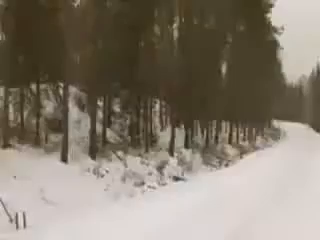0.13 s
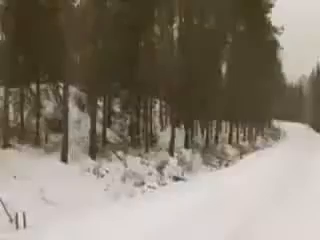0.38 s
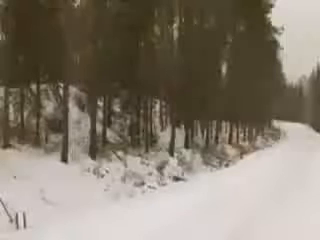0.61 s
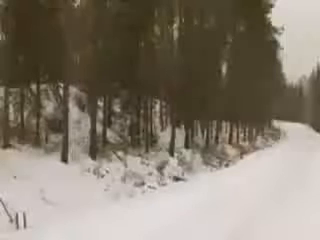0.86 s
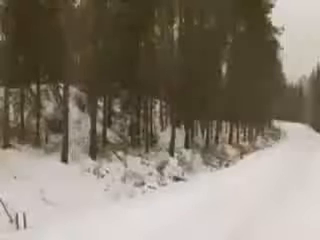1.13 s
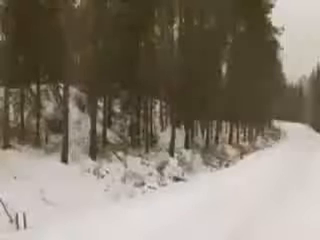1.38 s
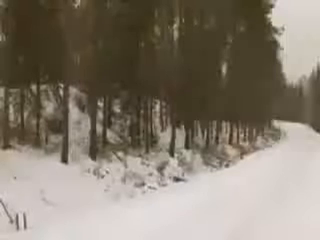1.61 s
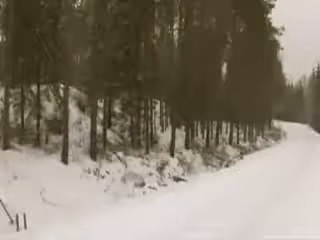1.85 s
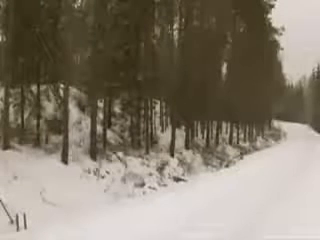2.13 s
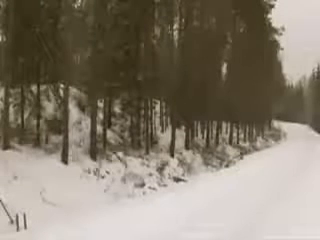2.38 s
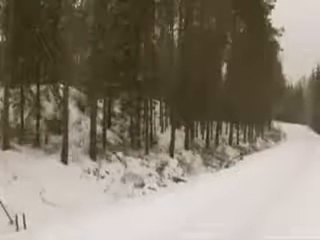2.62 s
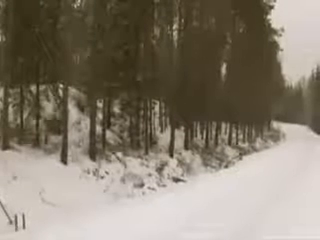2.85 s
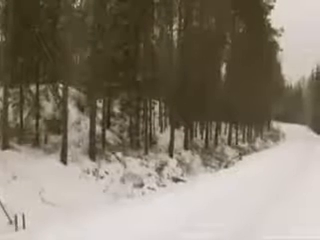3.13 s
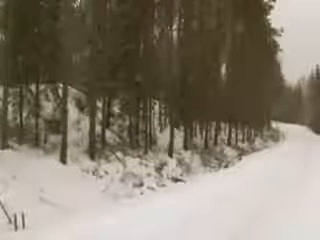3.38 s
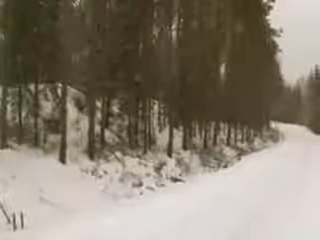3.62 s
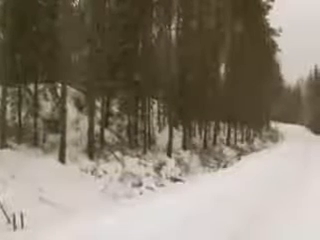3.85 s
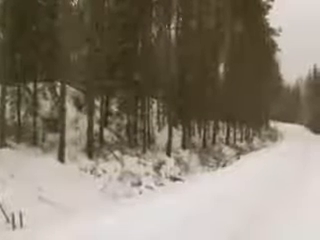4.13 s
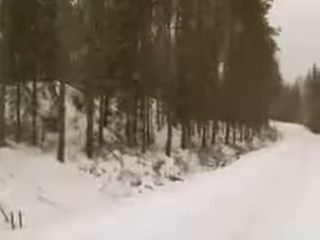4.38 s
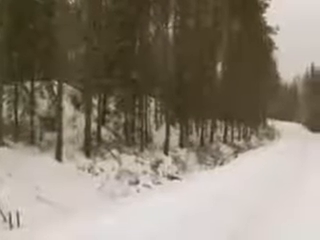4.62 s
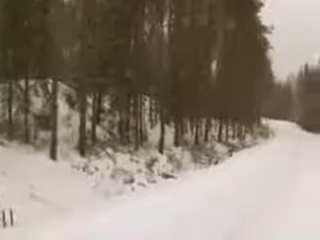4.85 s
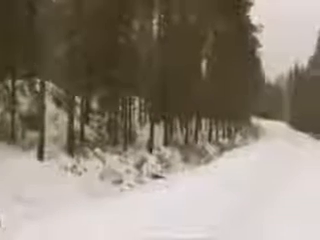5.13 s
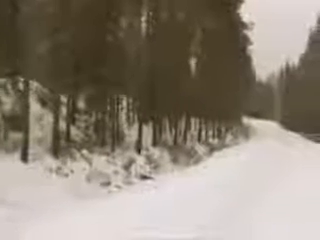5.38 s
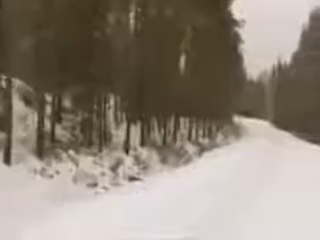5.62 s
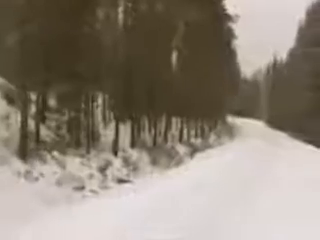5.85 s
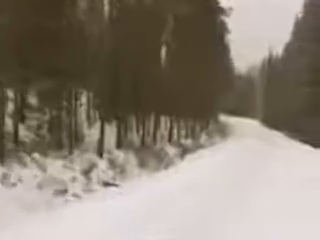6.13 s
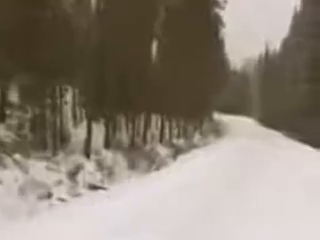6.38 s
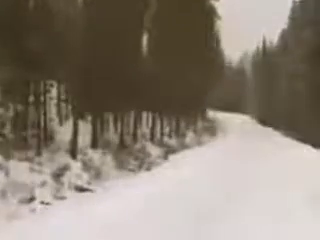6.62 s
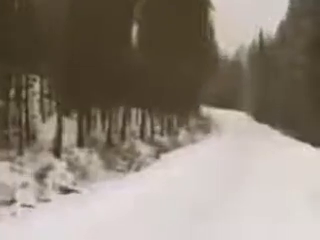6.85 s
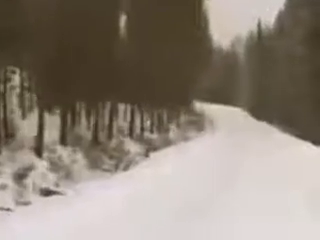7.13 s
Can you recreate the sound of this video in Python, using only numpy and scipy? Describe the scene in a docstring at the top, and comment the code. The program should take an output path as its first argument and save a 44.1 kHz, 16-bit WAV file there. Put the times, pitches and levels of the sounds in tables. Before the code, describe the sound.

Outdoors in a snowy spruce forest, an unseen hound yelps singly, first with smooth, hollow cries, then with brighter, rougher ones. Trunks answer at once and a diffuse tail follows. Rustling and dull hand knocks near the microphone soon settle into soft hiss. A longer pause comes near three seconds, then more yelps, and a last shorter, higher one. The sound is nearly mono and dull on top.

```python
"""A hound yelps again and again while it runs through a snowy spruce forest; the trunks hold each yelp on.
Close by, a rustle, a low rush and handling rumble die away over a quiet hiss.
Each yelp is a stack of gliding tones, roughened at random; hoarse puffs and the other layers are shaped noise.
The forest is a few early echoes and three long tails of scattered ones.
One signal feeds both channels, the left a little late above the bass."""
import sys
import numpy as np
from scipy import signal
from scipy.io import wavfile
from scipy.ndimage import uniform_filter1d

SR = 44100
rng = np.random.default_rng(int(sys.argv[2]) if len(sys.argv) > 2 else 0)


def to_wav(sig):
    """Store sig (one row per channel, or 1-D mono) as 16-bit WAV at the path in sys.argv[1].

    Samples outside -1..1 are clipped; the rate is SR.
    """
    pcm = np.clip(np.atleast_2d(sig), -1, 1) * 32767
    pcm = np.round(pcm).astype(np.int16)
    wavfile.write(sys.argv[1], SR, pcm.T)  # frames by channels


def volts(x):
    """Linear amplitude factor 10**(x/20) for a level x in dB, scalar or array-like."""
    e = np.asarray(x, float) / 20
    return 10 ** e


N = 319391  # length of the scene in samples


def evened(x):
    """Scales a sound to an rms (average strength) of 1."""
    return x / np.sqrt(np.mean(abs(x) ** 2) + 1e-20)


def read(points, hz):
    """Reads a table at the given frequencies, with straight lines along a log-frequency axis."""
    table_hz, value = np.transpose(points)
    return np.interp(np.log(hz + 1), np.log(table_hz + 1), value)


def curve(rows):
    """Turns a table of times and levels into a gain at every sample."""
    time_s, db = np.transpose(rows)
    return volts(np.interp(np.arange(N) / SR, time_s, db))


def swells(rows):
    """Adds up bell-shaped rises of gain."""
    t = np.arange(N) / SR
    return sum(volts(db) * np.exp(-((t - centre_s) / width_s) ** 2) for centre_s, db, width_s in rows)


def drift(shape, size):
    """Slow random swings of rms 1: random numbers averaged twice over size samples."""
    once = uniform_filter1d(rng.standard_normal(shape), size=size)
    return evened(uniform_filter1d(once, size=size))


def noise(spectrum, patchy_db, size=1024):
    """Noise of rms 1 from random short-time spectra whose level drifts in patches of time and pitch."""
    frames, hz = 4 * N // size + 5, np.fft.rfftfreq(size, 1 / SR)
    a, b, patches = rng.standard_normal((frames, len(hz), 3)).T
    patches = uniform_filter1d(patches, size=10, axis=0)
    patches = evened(uniform_filter1d(patches, size=8, axis=1))
    level_db = read(spectrum, hz)[:, None] + patchy_db * patches
    spectra = (a + 1j * b) * volts(level_db)
    return evened(signal.istft(spectra, nperseg=size, noverlap=size * 3 // 4)[1][:N])


def add(mix, start_s, sound):
    """Mixes a sound in at its start time."""
    part = mix[round(start_s * SR):][:len(sound)]
    part += sound[:len(part)]


def yelp(start_s, length_s, onset_hz, held_hz, settle_s, ground_tone_db, attack_s, swell_db, open_db,
         facing_db, per_glide):
    """A gliding stack of partials; the folds close unevenly as the pitch moves, roughening high ones most."""
    # colour of the fourth and higher partials after throat and air: (frequency [Hz], level [dB])
    throat = [(1800, 16.5), (2200, 0), (2550, 3.5), (2850, -27), (3200, -17), (3700, -22), (4500, -19),
              (6000, -18), (7500, -31), (8600, -38.5)]
    # the throat is tuned to the held note, so partials change off it:
    # second, third, higher partials [dB per octave]
    off_note_db = (-28, -47, -25)
    # change against the ground tone at the very end: second, third, higher partials [dB]
    closing_db = (13, -9.5, 11.5)
    attack_db, release_s, release_db = -15.5, 0.0331, -19.5
    settle_shape = 1.5963  # exponent of the slide from onset to held note
    sag_s, sag = 0.0533, 0.1203  # the pitch drops by this share as the breath runs out
    hoarse = .035  # roughness of a held note

    t = np.arange(0, length_s, 1 / SR)
    left_s = length_s - t
    hz = held_hz * (onset_hz / held_hz) ** np.exp(-(t / settle_s) ** settle_shape)
    hz = hz * (1 - sag * np.clip(1 - left_s / sag_s, 0, 1) ** 2)

    # levels of the ground tone, second, third and higher partials
    through = t / length_s - .5
    closing = np.clip(1 - left_s / release_s, 0, 1) ** 2
    attack = np.clip(1 - t / attack_s, 0, 1)
    ground_db = ground_tone_db + swell_db * through + attack_db * attack + release_db * closing
    octaves_off = abs(np.log2(hz / held_hz)) * (left_s > sag_s)  # the final sag does not count
    over_db = np.outer(off_note_db, octaves_off) + open_db * through
    over_db = over_db + np.outer(closing_db, closing) + np.c_[list(facing_db[:3])]
    waver_db = 3 * drift((4, len(t)), size=round(0.013 * SR))  # each level swings on its own
    *low_db, high_db = ground_db + np.vstack([0 * t, over_db]) + waver_db

    wobble = evened(uniform_filter1d(rng.standard_normal(len(t)), size=300))
    turns = np.cumsum(hz * (1 + 0.01177 * wobble)) / SR
    k = np.arange(1, 18)[:, None]  # number of each partial

    # the treble follows all overtones, with slow uneven swings
    effort_db = 20 * np.log10(np.linalg.norm(volts([*low_db[1:], high_db]), axis=0))
    treble_db = effort_db + facing_db[3] + 3.0 * drift((len(k), len(t)), size=500)
    level_db = read(throat, k * hz) + np.where(k * hz > 3000, treble_db, high_db)
    level_db[:3] = low_db

    # a growing share of each partial is replaced by random swings, which smears its pitch
    rough = hoarse + per_glide * abs(np.gradient(np.log2(hz), t))
    share = np.clip(rough * k ** 1.2, 0, .9)
    a, b = drift((2, len(k), len(t)), size=90) / np.sqrt(2)
    swing = np.sqrt(1 - share ** 2) + share * (a + 1j * b)
    partials = volts(level_db) * swing * np.exp(2j * np.pi * k * turns)
    voice = np.sqrt(2) * partials.real.sum(0)
    return voice * signal.windows.tukey(len(t), .08)


def forest(x):
    """Near trunks answer first, then scattered echoes fade by pitch; the paths change as the hound runs."""
    # first trunks to answer: (delay [s], level [dB])
    trunks = [(.007, -17), (.016, -12.5), (.029, -20.5), (.047, -13.5), (.068, -27), (.095, -13.5)]
    # how long the scattered echoes take to fade by 60 dB: (frequency [Hz], fade time [s])
    fade_times = [(300, 0.37), (550, 2.46), (1100, 1.6), (1700, 1.224), (2300, 1.6), (3000, 0.47),
                  (6000, 0.74)]
    tails_db, paths_per_s = -10.5, 5.3

    # three sets of clicks of random sign, one click at a random place in every 24 samples
    clicks = np.zeros((3, 3 * SR))
    at = np.arange(900, 3 * SR - 24, 24) + rng.integers(0, 24, (3, 1 + (3 * SR - 925) // 24))
    np.put_along_axis(clicks, at, rng.choice([-1., 1.], at.shape), 1)
    hz, t, spectra = signal.stft(clicks, SR, nperseg=256)
    fade = volts(-60 * t / read(fade_times, hz)[:, None])
    tails = signal.istft(spectra * fade, SR, nperseg=256)[1]
    tails *= volts(tails_db) / np.linalg.norm(tails[0])

    # the sound swings between the three tails at steady total power
    turn = 2 * np.pi * (paths_per_s * np.arange(N) / SR + np.arange(3)[:, None] / 3)
    sent = x * np.sqrt(2 / 3) * np.cos(turn)
    far = signal.fftconvolve(sent, tails, axes=1)[:, :N].sum(0)
    near = sum(volts(db) * np.pad(x, (round(delay_s * SR), 0))[:N] for delay_s, db in trunks)
    return near + far


def rustle():
    """Patchy bright noise that dies away, with short swells."""
    # colour: (frequency [Hz], relative level [dB])
    colour = [(710, -40.5), (1200, -31), (1640, 1), (1930, -4.5), (4240, -6.5), (7100, -13), (8500, -21.5),
              (11000, -57.5), (18700, -120)]
    # fading: (time [s], level [dB])
    levels = [(0, -46), (.2, -50.5), (.45, -50.5), (.53, -47), (.6, -55.5), (.8, -53.5), (.9, -61),
              (1.9, -74.5), (2.1, -93)]
    # short swells: (time [s], level [dB], width [s])
    brushes = [(1.434, -68, 0.03), (1.708, -58.5, 0.059)]
    return (curve(levels) + swells(brushes)) * noise(colour, patchy_db=3.0, size=512)


def rush():
    """Low, slightly patchy noise that sinks in level over the first three seconds."""
    # colour: (frequency [Hz], relative level [dB])
    colour = [(100, -49), (160, 1), (330, -4.5), (520, -0.5), (750, -6.5), (1100, -9), (1600, -12.5),
              (3000, -30.5)]
    # fading: (time [s], level [dB])
    levels = [(0, -41.5), (1.6, -45), (2.4, -51), (2.75, -51.5), (3, -58.5)]
    return curve(levels) * noise(colour, patchy_db=-0.41)


def rumble():
    """The holding hand calms down; a few knocks stand out of a lumpy low noise."""
    # colour: (frequency [Hz], relative level [dB])
    colour = [(12, -37.5), (20, -3), (81, 7.5), (129, -2.5), (185, -3.5), (240, -10.5), (310, -50.5),
              (530, -120)]
    # knocks in the hand: (time [s], level [dB], width [s])
    bumps = [(.3, -42, 0.099), (.75, -36, 0.0687), (.97, -44, 0.0324), (1.91, -46, 0.0377),
             (2.12, -44, 0.034), (2.3, -52, 0.068), (4.07, -58, 0.036), (4.29, -51.5, 0.0494),
             (5.62, -52.5, 0.052), (6.84, -49, 0.0702)]
    start_db, end_db, calm_s, lumps_db = -42, -57, 1.29, 2
    calm = np.exp(-np.arange(N) / SR / calm_s)
    grip_db = end_db + (start_db - end_db) * calm + lumps_db * drift(N, size=3000)
    return (volts(grip_db) + swells(bumps)) * noise(colour, patchy_db=2.5, size=4096)


def hiss():
    """Quiet noise at an unchanging overall level."""
    # colour: (frequency [Hz], relative level [dB])
    colour = [(150, -41), (250, -16.5), (500, -13.5), (900, -19), (1600, -23.5), (2500, -22.5),
              (5000, -24.5), (7500, -28.5), (8400, -27), (9000, -40.5)]
    return volts(-59) * noise(colour, patchy_db=.4)


def rasps():
    """Where the voice breaks, air rushes past slack folds in short rough puffs of noise."""
    # hoarse puffs: (start [s], level at the peak [dB], length [s])
    puffs = [(1.37, -49.5, 0.063), (2.034, -37, 0.071), (2.17, -41.5, 0.029), (2.737, -49.5, 0.028),
             (4.036, -48.5, 0.058), (4.423, -35.5, 0.03), (5.039, -41, 0.07), (5.549, -40, 0.07),
             (6.567, -41.5, .05)]
    # colour: (frequency [Hz], relative level [dB])
    colour = [(500, -8), (900, 4), (1600, -5.5), (2500, -3), (2900, -12.5), (4000, -10.5), (6000, -20.5),
              (8000, -31.5)]
    t = np.arange(N) / SR
    gain = sum(volts(db) * np.sin(np.pi * np.clip((t - start_s) / length_s, 0, 1)) ** 2
               for start_s, db, length_s in puffs)
    return gain * noise(colour, patchy_db=-1.0, size=256)


def scene():
    """Hound and forest over hiss, rush, rustle and rumble, the same in both channels."""
    # timing and pitch, one row a yelp:
    # (start [s], length [s], onset pitch [Hz], held pitch [Hz], time to settle [s])
    yelps = [(0, 0.135, 631.6, 536.7, 0.041), (0.316, 0.1558, 745.4, 540, 0.03213),
             (0.755, .185, 707.4, 550.7, .03), (1.359, 0.1588, 781.5, 557.7, .065),
             (2.02, 0.1787, 727.5, 562.8, 0.0427), (2.595, 0.171, 488.2, 541.9, 0.04185),
             (3.873, 0.1802, 696.8, 556, 0.04483), (4.416, .154, 460.8, 533.6, .025),
             (4.932, 0.1479, 655.5, 536.7, 0.02666), (5.434, 0.1538, 603.6, 533.4, 0.02625),
             (6.493, 0.0912, 758.9, 693.7, 0.03866)]
    # strength, one row a yelp: (ground tone [dB], attack [s], swell over the yelp [dB],
    # overtones' gain over the yelp [dB])
    efforts = [(-38.5, 0.0021, -9, 0.85), (-25.5, 0.0505, -3.5, 7.5), (-26.5, 0.02, -7, 12),
               (-28.5, 0.0315, 1.5, 0.22), (-30, 0.016, -3, -4.5), (-26.5, 0.0399, -0.5, -8.5),
               (-26.5, 0.02, 0.5, 1.75), (-29.5, 0.0179, 1.77, -8.5), (-27.5, 0.0081, 3.65, -7.5),
               (-33.5, .014, -2.98, 3.85), (-27.5, 0.021, 0, -1)]
    # as the head turns, one row a yelp: (second partial [dB], third [dB], higher [dB], all three
    # against the ground tone, treble above 3 kHz [dB], share thrown into the trees [dB])
    facings = [(-13, -18, -33, -3.5, 1.24), (-16.5, -23.5, -36, -13.5, -1), (-15.5, -16, -32.5, -12.5, 1.5),
               (-17.5, -15.5, -35, -5, 1.12), (-1, -2.5, -9, -12.5, 0.02), (-4, -6, -17.5, -15, -1.53),
               (-7, -6, -16.5, -14, -1.45), (1, -6.5, -16.5, -14.5, 0.26), (-6, 1, -12.5, -12.5, -0.35),
               (-5, -1.5, -15.5, -11.5, 2.5), (-7.5, -15, -13, -8.5, -1.13)]
    # roughness added by gliding, one value a yelp: roughness [per octave a second]
    hoarse_per_glide = [.025, .025, .025, .04, .07, .025, .015, .025, .035, .035, .012]

    hound = rasps()
    into_trees = hound.copy()
    for row, effort, facing_db, per_glide in zip(yelps, efforts, facings, hoarse_per_glide):
        voice = yelp(*row, *effort, facing_db, per_glide)
        add(hound, row[0], voice)
        add(into_trees, row[0], volts(facing_db[4]) * voice)
    sound = hound + forest(into_trees) + hiss() + rush() + rustle() + rumble()
    return np.array([sound, sound])


def band_limit(x):
    """A steep low-pass at the top of the band."""
    return signal.sosfilt(signal.butter(12, 8900, fs=SR, output="sos"), x)


def record(dry):
    """The left channel lags the right, except in the bass, which stays mono."""
    late_samples, mono_below_hz = 2, 390
    late = np.pad(dry[0], (late_samples, 0))[:N]
    mid = (late + dry[1]) / 2
    highpass = signal.butter(4, mono_below_hz, "high", fs=SR, output="sos")
    side = signal.sosfiltfilt(highpass, late - dry[1]) / 2
    return band_limit(np.array([mid + side, mid - side]))


dry = scene()
out = record(dry)
to_wav(out)
```